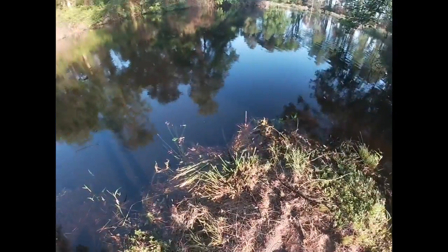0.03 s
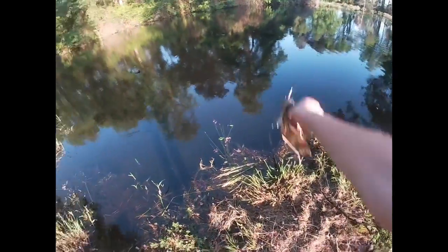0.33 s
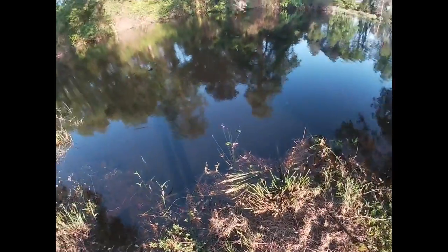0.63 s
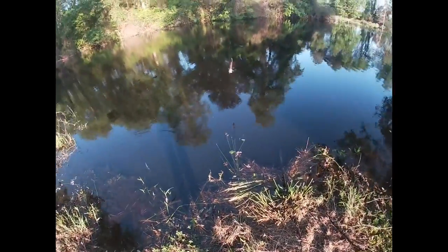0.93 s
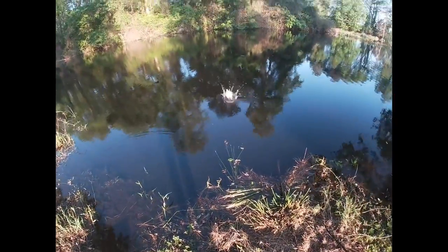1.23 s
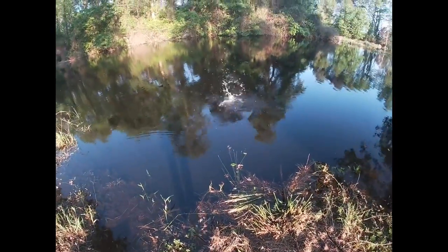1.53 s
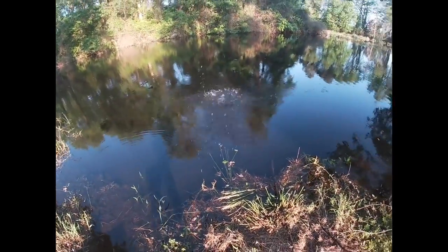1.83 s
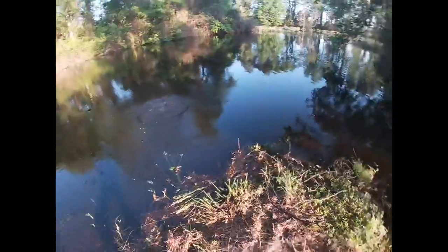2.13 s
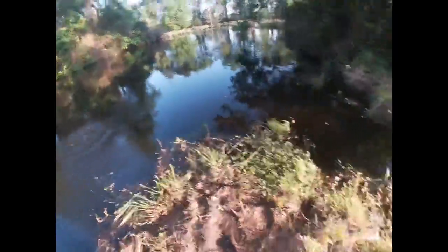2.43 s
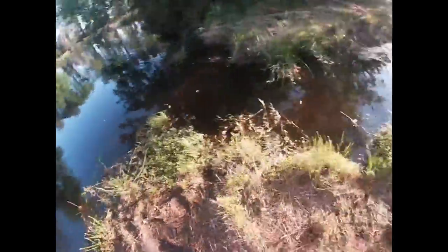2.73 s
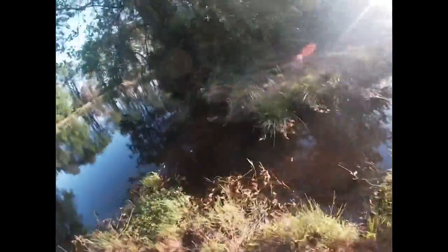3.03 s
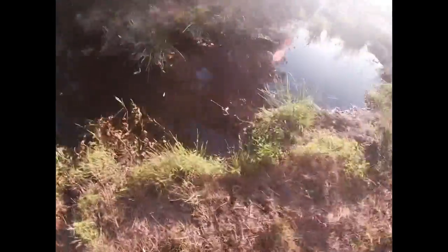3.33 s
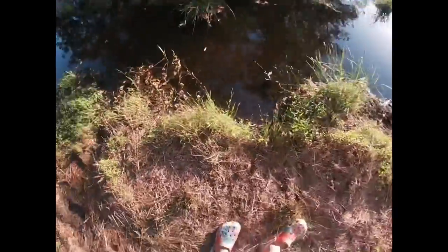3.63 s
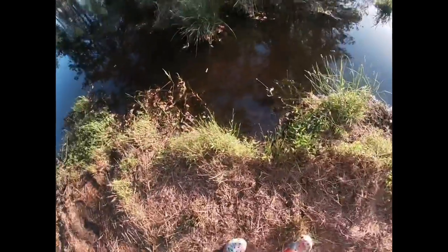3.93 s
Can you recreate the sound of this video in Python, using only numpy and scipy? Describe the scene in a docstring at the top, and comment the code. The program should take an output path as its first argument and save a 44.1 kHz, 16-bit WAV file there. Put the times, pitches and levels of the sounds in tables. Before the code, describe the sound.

A stone splashes into a pond at about 1.1 seconds, after a soft sleeve swish at the start. It gulps, and bubbles and droplets patter until about 2 seconds. Wind buffets the microphone from 0.4 seconds, strongest around 1.3 and 2.5. From 2 to 4 seconds, feet shuffle in dry grass, stems snap and the hand-held camera clicks and rubs. Faint insects and a few distant bird whistles lie behind.

```python
"""A sleeve swishes with a throw and wind starts to buffet the microphone; then a stone slaps into a pond.
The air cavity collapses with a gulp, trapped bubbles ring and spray patters back onto the water.
Close by, a hand-held camera clicks and rubs in the grip, and feet shuffle on the dry grass of the bank,
snapping stems. Behind it all a far bird whistles and insects drone."""
import sys
import numpy as np
from scipy import signal
from scipy.fft import rfft, irfft
from scipy.io import wavfile
from scipy.ndimage import uniform_filter1d

SR = 44100
rng = np.random.default_rng(int(sys.argv[2]) if len(sys.argv) > 2 else 0)


def waveform_to_disk(signal):
    """Save audio, clipped to [-1, 1], as 16-bit WAV at the path in sys.argv[1]."""
    frames = np.transpose(np.atleast_2d(signal))
    scaled = np.clip(frames, -1, 1) * 32767
    samples = np.round(scaled).astype(np.int16)
    wavfile.write(sys.argv[1], SR, samples)


N = 176400
T = np.arange(N) / SR
HZ = np.maximum(np.fft.rfftfreq(N, 1 / SR), 1)
WATER_LOW_CUT_HZ, FRICTION_LOW_CUT_HZ, AIR_LOW_CUT_HZ = 556, 406, 21.8


# hits of tearing water (time [s], attack [s], hold [s], decay [s], level [dB])
SPLASH_HITS = [(1.103, .0003, 0.0036, 0.0014, -36), (1.107, 0.0017, 0.013, 0.036, -41.5),
               (1.2307, 0.00097, 0.0031, 0.0025, -33), (1.2358, .002, 0.0045, .0015, -25),
               (1.243, .003, 0.0092, 0.022, -37), (1.266, 0.0011, 0.0034, 0.01, -39.5),
               (1.185, .001, .005, .008, -45), (1.718, .001, 0.0031, .004, -53),
               (1.778, 0.00038, 0.0015, 0.0013, -41), (1.798, 0.00043, 0.0018, 0.0012, -55)]
# tone of the splash (frequency [Hz], gain [dB])
SPLASH_EQ = [(350, -34), (600, -1), (1140, -6.5), (1290, -7), (1490, -1.5), (1910, -7.5), (2070, 4),
             (2250, -4), (3570, -2.5), (5080, -8.5), (5510, -3.5), (6400, -15), (8630, -11.5), (11200, -31),
             (15500, -43)]
def splash():
    """The slap of entry and the jet that follows: a dense crackle of tearing water."""
    out = np.zeros(N)
    for start, attack, hold, decay, db in SPLASH_HITS:
        release = np.exp(-np.maximum(T - start - attack - hold, 0) / decay)
        envelope = np.clip((T - start) / attack, 0, 1) * release
        crackle = equalise(ticks(per_s=5800, spread_db=3.5), SPLASH_EQ, WATER_LOW_CUT_HZ)
        out += amp(db) * envelope * crackle
    return out


# gulps and blips (time [s], pitch [Hz], level [dB], attack [s], decay [s], glide [octaves/s])
BUBBLE_NOTES = [(1.1053, 1380, -22.5, 0.00045, 0.00084, -13), (1.1035, 890, -30, 0.0019, 0.0012, 5),
                (1.19, 363, -20.5, 0.005, 0.011, 11.5), (1.206, 337, -20.5, 0.0024, 0.0059, -1),
                (1.188, 940, -38.5, 0.0037, 0.0086, 2), (1.189, 2050, -39, 0.0027, .004, -6),
                (1.203, 2510, -32.5, 0.00087, 0.0018, 8), (1.204, 1470, -37, 0.0014, 0.0077, 0),
                (1.216, 2070, -33.5, 0.0046, 0.0027, 5), (1.236, 1788, -26, 0.0038, 0.0011, 110),
                (1.24, 1100, -27, 0.00033, 0.0031, 2), (1.239, 3270, -24.5, .0005, 0.0014, 38),
                (1.239, 135.2, -16, 0.0037, 0.016, 1.5), (1.266, 860, -33.5, 0.0012, 0.0099, 2),
                (1.277, 307, -24, 0.00128, 0.0053, -5), (1.281, 1350, -36.5, 0.0025, .005, 8),
                (1.3502, 3800, -28.5, 0.00039, 0.0012, 79), (1.358, 3480, -33, 0.00035, 0.0018, 21),
                (1.366, 2360, -35, .003, 0.0026, -1), (1.417, 5200, -39.5, 0.0014, 0.0032, 26),
                (1.486, 2130, -36.5, .001, 0.0024, 12), (1.480, 973, -40.5, 0.0019, 0.0081, 8),
                (1.586, 1910, -39, .002, 0.0037, -2), (1.589, 963, -36, 0.0017, 0.0073, -18),
                (1.714, 1260, -38, 0.0012, 0.0036, 3), (1.772, 1370, -30.5, 0.0052, 0.003, 149),
                (1.773, 1110, -37.5, 0.0034, 0.0079, 33), (1.812, 950, -43, 0.0078, 0.011, 17.5),
                (1.862, 591, -37, 0.021, 0.0082, 34)]
def bubbles(max_rise_octaves=1.3):
    """Trapped air rings; most bubbles bend up in pitch as they near the surface."""
    out = np.zeros(N)
    for start, hz, db, attack, decay, glide in BUBBLE_NOTES:
        t = np.arange(0, attack + 6 * decay, 1 / SR)
        pitch = hz * 2 ** np.minimum(glide * t, max_rise_octaves)
        envelope = np.minimum(t / attack, 1) * np.exp(-np.maximum(t - attack, 0) / decay)
        add(out, start, amp(db) * envelope * sine(pitch))
    return out


# swells of falling spray (time [s], level [dB])
SPRAY_FADER = [(1.13, -79), (1.19, -49.5), (1.28, -53), (1.32, -54), (1.39, -52.5), (1.46, -52.5),
               (1.53, -56.5), (1.60, -48.5), (1.66, -48), (1.70, -53), (1.76, -50), (1.83, -54.5),
               (1.88, -60), (1.97, -72), (2.25, -99)]
# tone of the drops (frequency [Hz], gain [dB])
SPRAY_EQ = [(440, -44), (750, -3.5), (940, -1), (1220, -10), (2150, -8), (3250, -10.5), (4020, -12.5),
            (8530, -22.5), (15000, -39)]
def spray(plinks_per_s=3000, decay_cycles=5.6, bend=0.087):
    """Drops fall back: a patter of impacts and tiny rising bubbles, the small high ones commonest."""
    t, plinks = np.arange(SR // 16) / SR, np.zeros(N)
    pitches = np.geomspace(800, 8000, 36)
    for hz in pitches:
        age = t * hz / decay_cycles  # in decay times
        plink = np.exp(-age) * np.sin(2 * np.pi * hz * t * (1 + bend * np.minimum(age, 10) / 2))
        triggers = ticks(plinks_per_s * hz / pitches.sum(), spread_db=4.5)
        plinks += np.sqrt(hz) * signal.oaconvolve(triggers, plink)[:N]
    plinks = equalise(plinks, SPRAY_EQ, WATER_LOW_CUT_HZ)
    patter = equalise(ticks(per_s=1700, spread_db=2), SPRAY_EQ, WATER_LOW_CUT_HZ)
    return fader(SPRAY_FADER) * (amp(2) * plinks + amp(-4) * patter)


# gusts on the microphone (time [s], level [dB])
GUST_FADER = [(0, -55), (.28, -51), (.40, -37), (.49, -43), (.56, -30.5), (.62, -38), (.72, -38.5),
              (.89, -45), (.945, -29), (1.0, -35.5), (1.07, -43.5), (1.14, -28), (1.22, -33), (1.26, -23),
              (1.32, -20), (1.36, -34), (1.44, -24.5), (1.48, -29), (1.54, -40), (1.59, -33), (1.66, -29.5),
              (1.72, -39.5), (1.82, -27), (1.93, -29.5), (2.0, -40), (2.12, -39.5), (2.22, -33),
              (2.28, -37.5), (2.38, -36.5), (2.42, -21.5), (2.48, -31), (2.54, -21.5), (2.64, -31),
              (2.72, -24), (2.80, -39), (2.95, -32.5), (3.12, -30), (3.24, -30.5), (3.32, -33.5),
              (3.48, -42), (3.62, -45.5), (4, -48.5)]
# filter sweep of the rumble, higher for smaller eddies (time [s], cutoff [Hz])
EDDY_SWEEP = [(0, 43.7), (.4, 65.5), (.6, 118), (.8, 63.6), (.96, 106.5), (1.12, 42), (1.3, 157),
              (1.6, 122), (1.8, 81), (2.36, 68.5), (2.43, 238), (2.49, 108), (2.53, 148), (2.6, 87),
              (2.72, 93), (2.85, 59.4), (3.3, 36.6), (4, 41)]
# single thumps of air (centre time [s], pitch [Hz], level [dB], width [s])
BUFFET_HITS = [(0.348, 128, -31.5, 0.0026), (0.469, 66, -27, 0.01), (.514, 92.5, -19, 0.0031),
               (0.558, 56.4, -22.5, 0.022), (0.754, 65, -21, 0.0022), (0.944, 112, -25, 0.008),
               (1.305, 111, -26, 0.0078), (1.319, 128, -30, .004), (1.389, 121, -11, 0.0018),
               (1.433, 193, -23, .005), (1.467, 136, -17.5, 0.0034), (1.587, 123, -18, 0.0024),
               (1.786, 51.3, -7, 0.0023), (1.849, 135, -16, 0.0012), (1.867, 66, -9, 0.0031),
               (2.399, 200, -13, 0.0018), (2.408, 100, -4.5, 0.0026), (2.426, 332, -25, 0.00069),
               (2.441, 200, -11.5, 0.0022), (2.456, 775, -25.5, 0.00036), (2.464, 510, -20, 0.0011),
               (2.514, 310, -16.5, 0.0012), (2.521, 111, -9, .003), (2.543, 85, -21, 0.0054),
               (2.697, 166, -23, 0.0021), (2.709, 82, -14, 0.0051), (2.724, 130, -22, 0.0027),
               (3.074, 36.5, -9.5, 0.012)]
def wind(slope=2.6, wobble_db=2.35):
    """Turbulence rumbles on the microphone, brighter as the eddies shrink, with single hard buffets."""
    spectrum, rumble = rfft(rng.standard_normal(N)), np.zeros(N)
    cutoffs = np.geomspace(35, 240, 7)
    sweep = np.interp(T, *np.transpose(EDDY_SWEEP))
    position = np.interp(sweep, cutoffs, np.arange(len(cutoffs)))
    bass_band = 1 / np.hypot(1, (AIR_LOW_CUT_HZ / HZ) ** 2) / np.hypot(1, (HZ / 400) ** 3)
    for k, hz in enumerate(cutoffs):
        response = bass_band / np.hypot(1, (HZ / hz) ** slope)
        crossfade = np.maximum(1 - abs(position - k), 0)
        rumble += crossfade * unit(irfft(spectrum * response, N))
    power = uniform_filter1d(uniform_filter1d(rumble ** 2, size=2400), size=1200)
    compressed = rumble / np.sqrt(power + 0.064)
    out = compressed * fader(GUST_FADER) * amp(wobble_db * wander(rate_hz=25))
    for centre, hz, db, width in BUFFET_HITS:
        t = T - centre
        out -= amp(db) * np.sin(2 * np.pi * hz * t) / np.cosh(np.clip(t / width, -20, 20))
    return out


# grip clicks (time [s], level [dB], tilt [dB/octave], ring length [x], relative thud level [dB])
GRIP_HITS = [(0.384, -38.5, 6, 1.1, -16), (.400, -31, 2, 1.3, -18), (0.5325, -25, 1, .7, -40),
             (0.567, -39, -17, 1.5, -25), (0.6523, -42.5, 6.5, .8, -24), (2.0431, -29, 0.5, 0.8, -15),
             (2.611, -24, -4.5, 1.64, -6.5), (2.8, -26, 2, 0.81, 2.5), (2.906, -28, 2, 1.3, -15),
             (2.961, -27, -13, 1.4, -29), (2.9956, -31.5, -12, 3.3, -24), (3.025, -26, -4, 0.46, -26),
             (3.041, -23.5, -9, 0.57, -6), (3.9808, -27.5, 1, 0.92, -31)]
# resonances of the camera case (frequency [Hz], level [dB], time to fall 60 dB [s])
CASE_MODES = [(787, -16, 0.007), (1278, 0, 0.02), (1600, -1, 0.013), (1863, -3, 0.019), (2530, -5, 0.0082),
              (3120, -10, 0.017), (3590, -1.5, 0.014), (5200, -14, 0.0077), (8630, -28, 0.0063)]
def case_clicks(slip_s=0.00023, scatter_db=5, thud_hz=480, thud_decay_s=0.0008):
    """A short gritty slip of the fingers rings the plastic case, a little differently each time."""
    t, out = np.arange(SR // 16) / SR, np.zeros(N)
    pivot_hz = CASE_MODES[1][0]
    for start, db, tilt, length, thud_db in GRIP_HITS:
        grit = amp(tilt - 3.5) * rng.standard_normal(len(t)) * np.exp(-t / slip_s)
        ring = np.zeros(len(t))
        for hz, mode_db, t60 in CASE_MODES:
            onset_db = mode_db + scatter_db * rng.uniform(-0.28, 1) + tilt * np.log2(hz / pivot_hz)
            envelope = amp(onset_db - 60 * t / (t60 * length))
            ring += envelope * np.sin(2 * np.pi * (hz * t + rng.random()))
        click = ring * (1 - np.exp(-2 * t / slip_s))
        thud = amp(thud_db) * np.exp(-t / thud_decay_s) * np.sin(2 * np.pi * thud_hz * t)
        add(out, start, amp(db) * (click / abs(click).max() + thud + grit))
    return out


# snaps in the dry grass, the first one a late drop of spray ticking (time [s], level [dB], pitch [Hz])
SNAP_HITS = [(1.9485, -34, 5300), (2.023, -36, 8600), (2.178, -45.5, 7300), (2.477, -36, 2700),
             (2.489, -42, 2110), (2.746, -41, 6060), (2.825, -44, 7240), (3.014, -23.5, 3100),
             (3.066, -29, 3070), (3.1106, -33.5, 3730), (3.3208, -31.5, 2530), (3.3578, -47, 4000),
             (3.626, -37.5, 2380)]
def stem_snaps(decay_s=0.0017, bandwidth=0.21):
    """Dry stems break and a stray drop ticks, each a tight burst of band-passed noise."""
    t, out = np.arange(SR // 40) / SR, np.zeros(N)
    edge = 1 + bandwidth / 2
    for start, db, hz in SNAP_HITS:
        band = signal.butter(1, [hz / edge, hz * edge], "band", fs=SR)
        snap = signal.lfilter(*band, rng.standard_normal(len(t)) * np.exp(-t / decay_s))
        add(out, start, amp(db) * snap / abs(snap).max())
    return out


# fingers shifting on the case (time [s], level [dB])
RUB_FADER = [(2.87, -73), (2.9, -51), (2.915, -54.5), (2.95, -48.5), (2.99, -53), (3.03, -46),
             (3.06, -49.5), (3.12, -56), (3.2, -57.5), (3.25, -64)]
# tone of the rubbed case (frequency [Hz], gain [dB])
RUB_EQ = [(500, 0.5), (900, -5), (1320, 8.5), (1600, -6), (1900, 0.5), (2400, -10), (3200, -3), (4400, -7),
          (5100, -4), (5900, -13), (8000, -6), (9200, -7), (10500, -47), (15000, -54)]
def finger_rub():
    """Sticking and slipping skin excites the case."""
    return fader(RUB_FADER) * equalise(ticks(per_s=1600, spread_db=2), RUB_EQ, FRICTION_LOW_CUT_HZ)


# shoe strokes (peak time [s], attack [s], decay [s], level [dB], tilt [dB/octave])
SHOE_STROKES = [(.44, 0.064, 0.15, -55.5, 3), (2.343, 0.027, 0.01, -39, 3.5), (2.461, 0.1, 0.083, -53.5, 2),
                (2.566, 0.03, 0.035, -48, 2.5), (3.018, 0.036, 0.051, -41, 2),
                (3.147, 0.063, 0.041, -53, 12.5), (3.36, 0.029, 0.043, -52.5, 3.5),
                (3.466, 0.038, .04, -47.5, 0.5), (3.521, 0.023, 0.021, -38, 1), (3.6, 0.18, 0.07, -54, 3),
                (3.99, 0.22, .05, -59.5, -0.5)]
# tone of dry grass (frequency [Hz], gain [dB])
GRASS_EQ = [(260, -23), (450, -8.5), (809, -6), (1010, 1), (1280, -2.5), (2010, -2.5), (2900, -2),
            (4570, -9.5), (7980, -14), (9660, -22.5), (11500, -36.5), (15000, -44)]
def footsteps():
    """Each stroke of a shoe swells and dies, flicking many grass blades."""
    out = np.zeros(N)
    for peak, attack, decay, db, tilt in SHOE_STROKES:
        envelope = np.exp(-(np.minimum(T - peak, 0) / attack) ** 2 - np.maximum(T - peak, 0) / decay)
        blades = ticks(per_s=3200, spread_db=3.5)
        out += amp(db) * envelope * equalise(blades, GRASS_EQ, FRICTION_LOW_CUT_HZ, tilt)
    return out


# swish of the throwing arm (time [s], level [dB])
SLEEVE_FADER = [(0, -35), (.02, -45.5), (.07, -54), (.11, -58.5), (.17, -55), (.3, -53), (.34, -63),
                (.45, -59), (.58, -59), (.72, -70)]
# tone of the cloth (frequency [Hz], gain [dB])
SLEEVE_EQ = [(290, -33), (500, -8.5), (661, -3), (898, -4), (1370, 4), (1820, -13), (1990, -3), (2430, 2.5),
             (3300, -1), (3770, -28), (4090, -18), (5060, -4), (5400, -12.5), (8270, -22.5), (12000, -46),
             (15600, -74), (22000, -120)]
def sleeve():
    """Cloth slides on cloth with a fine, even grain of friction."""
    grain = ticks(per_s=8000, spread_db=0)
    return fader(SLEEVE_FADER) * equalise(grain, SLEEVE_EQ, FRICTION_LOW_CUT_HZ)


# far bird calls (time [s], length [s], pitch [Hz], level [dB])
BIRD_NOTES = [(0.423, .24, 2315, -60), (0.916, 0.057, 1960, -63), (2.043, 0.061, 1950, -54)]
def bird(arch=0.304, flutter=0.84):
    """Faint arched whistles that flutter on their way through the trees."""
    out = np.zeros(N)
    for start, length, hz, db in BIRD_NOTES:
        progress = np.linspace(0, 1, round(length * SR))
        jitter = 0.025 * wander(rate_hz=63)[:len(progress)]
        pitch = hz * (1 - arch * (progress - 0.33) ** 2 + jitter)
        add(out, start, amp(db) * np.sin(np.pi * progress) * sine(pitch))
    return out * (1 + flutter * wander(rate_hz=58))


# tone of the bed of insects and distant air (frequency [Hz], gain [dB])
AMBIENCE_EQ = [(100, 4.5), (300, -3), (550, -15.5), (1000, -13.5), (1900, -12.5), (2600, -13.5), (3200, -7),
               (3750, 1), (4200, -1.5), (4700, -14.5), (6000, -17), (8500, -23.5), (10000, -32),
               (12000, -44), (15000, -47)]
def insects(chorus_hz=3750, half_width_hz=650, flutter=0.15):
    """A distant chorus flutters in a narrow band over steady air."""
    bed = equalise(rng.standard_normal(N), AMBIENCE_EQ, AIR_LOW_CUT_HZ)
    chorus = irfft(rfft(bed) * np.exp(-((HZ - chorus_hz) / half_width_hz) ** 4), N)
    return amp(-55) * (bed + flutter * chorus * wander(rate_hz=48))


def bank_reverb(x, wet_db=-32.5, t60_s=0.16, build_s=0.022):
    """The banks and trees scatter back a short, faint tail."""
    t = T[:SR]
    tail = rng.standard_normal(SR) * amp(-60 * t / t60_s) * np.minimum(t / build_s, 1)
    return x + amp(wet_db) * signal.fftconvolve(x, tail / np.linalg.norm(tail))[:N]


def amp(db):
    """Decibels to gain."""
    return 10 ** (np.asarray(db) / 20)


def unit(x):
    """Scales to rms 1."""
    return x / np.sqrt(np.mean(x ** 2) + 1e-20)


def add(mix, start, sound):
    """Mixes a sound in at a start time in seconds."""
    part = mix[max(round(start * SR), 0):][:len(sound)]
    part += sound[:len(part)]


def sine(pitch):
    """Oscillator that follows a pitch curve in Hz."""
    return np.sin(2 * np.pi * np.cumsum(pitch) / SR)


def fader(points):
    """Gain along a dB curve, silent outside it."""
    return amp(np.interp(T, *np.transpose(points), left=-200, right=-200))


def equalise(x, points, low_cut_hz, tilt_db=0):
    """Applies an EQ curve, a tilt per octave and a low cut, then scales to rms 1."""
    hz, db = np.transpose(points)
    curve_db = np.interp(np.log(HZ), np.log(hz), db) + tilt_db * np.log2(np.minimum(HZ, SR / 5))
    return unit(irfft(rfft(x) * amp(curve_db) / np.hypot(1, (low_cut_hz / HZ) ** 4), N))


def wander(rate_hz):
    """Smooth random modulation, rms 1."""
    return unit(irfft(rfft(rng.standard_normal(N)) * np.exp(-(HZ / rate_hz) ** 2), N))


def ticks(per_s, spread_db):
    """Random impulses; more spread makes a few stand out."""
    size = amp(spread_db * np.minimum(rng.exponential(1, N), 4))
    return size * rng.choice([-1, 1], N) * (rng.random(N) < per_s / SR)


def scene():
    """Mono mix: water and bird with a touch of reverb; wind, foley and insect bed dry."""
    pond = bank_reverb(splash() + bubbles() + spray() + bird())
    gusts = wind()
    high_cut = signal.butter(4, 7800, fs=SR)  # takes the edge off the clicks and snaps
    transients = signal.lfilter(*high_cut, case_clicks() + stem_snaps())
    foley = transients + finger_rub() + footsteps() + sleeve()
    return (pond + gusts + foley + insects())[None]


def record(dry, cutoff_hz=15700):
    """A steep high cut on the whole mix."""
    low_pass = signal.firwin(511, cutoff_hz, window=("kaiser", 9), fs=SR)
    return signal.oaconvolve(dry, low_pass[None], "same")


dry = scene()
out = record(dry)
waveform_to_disk(out)
```